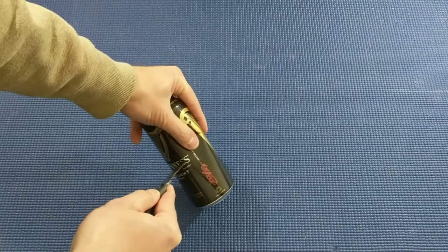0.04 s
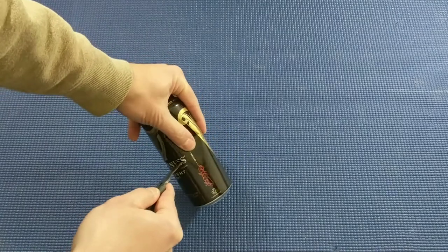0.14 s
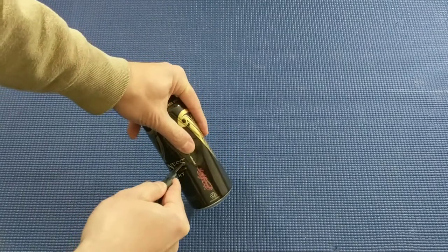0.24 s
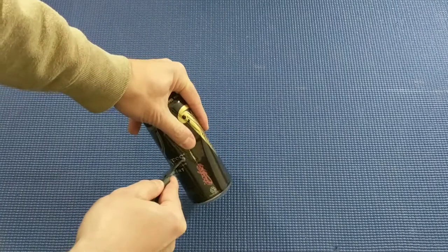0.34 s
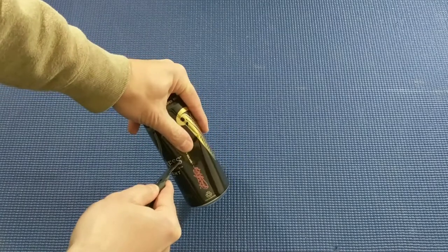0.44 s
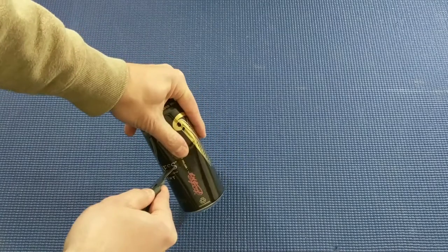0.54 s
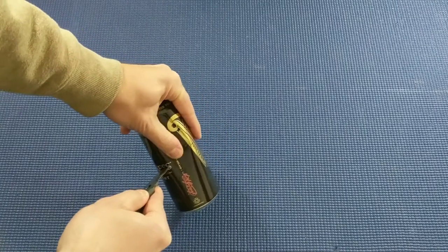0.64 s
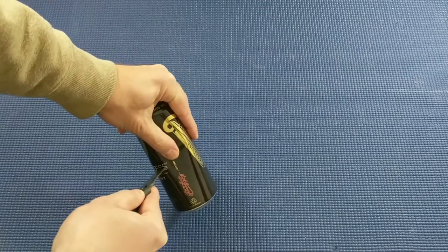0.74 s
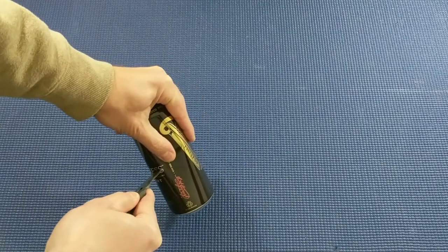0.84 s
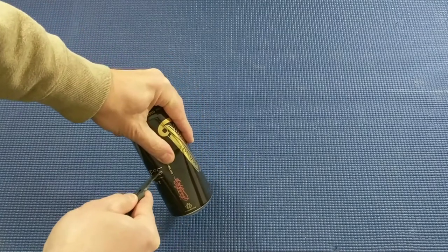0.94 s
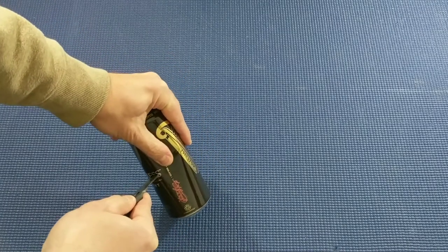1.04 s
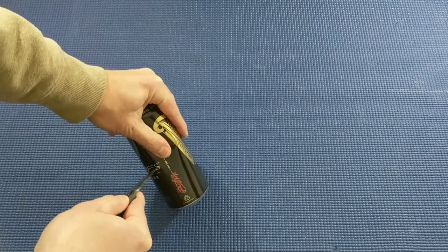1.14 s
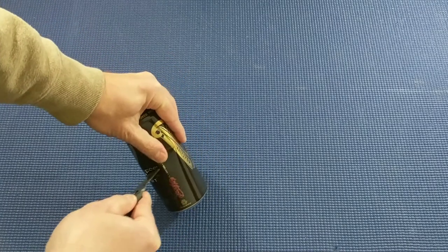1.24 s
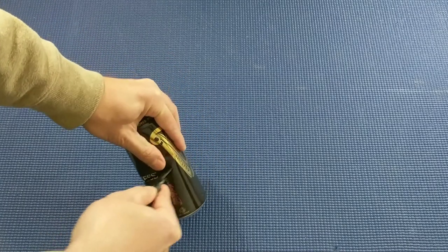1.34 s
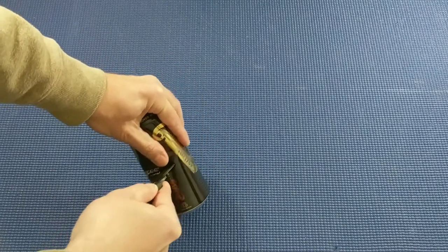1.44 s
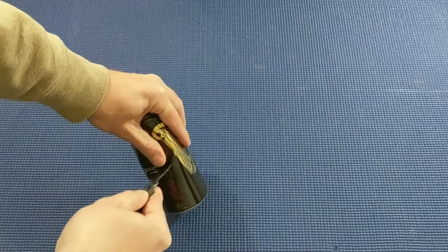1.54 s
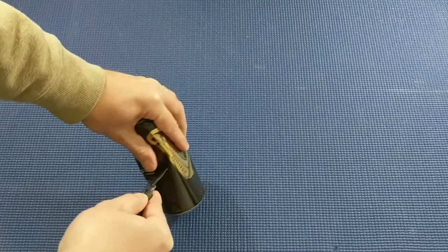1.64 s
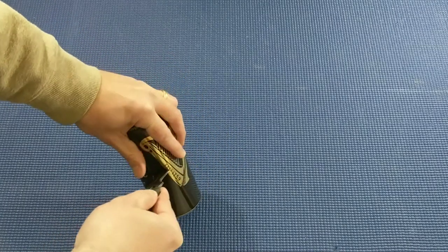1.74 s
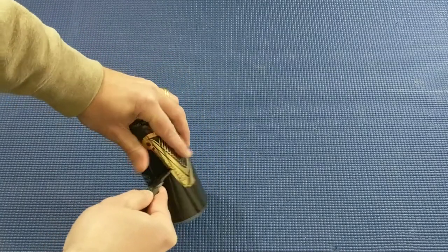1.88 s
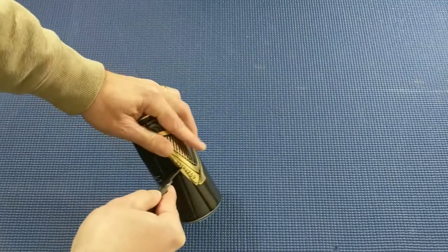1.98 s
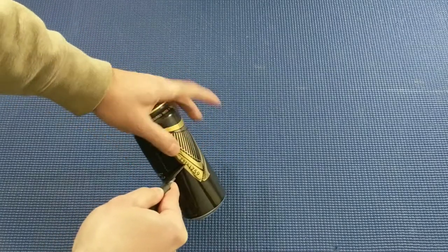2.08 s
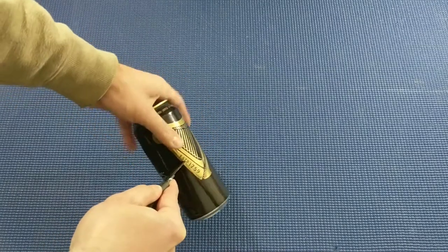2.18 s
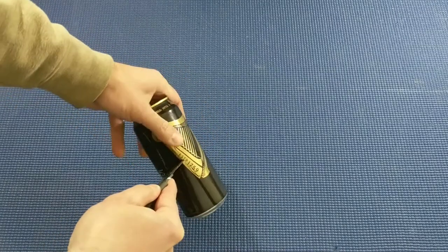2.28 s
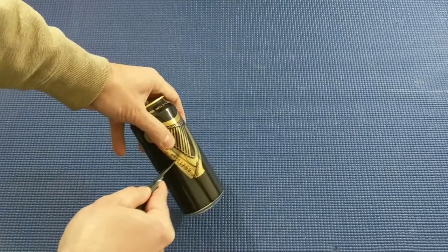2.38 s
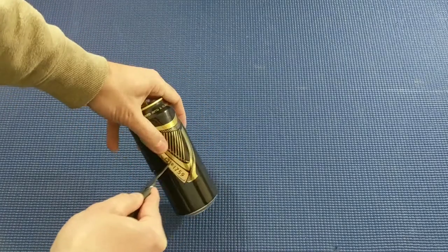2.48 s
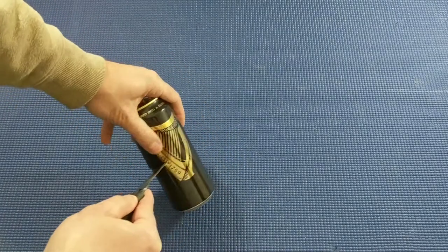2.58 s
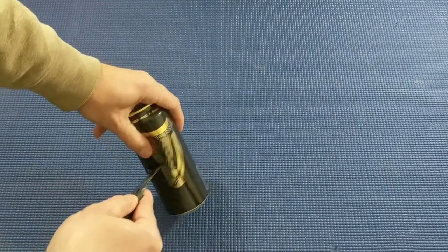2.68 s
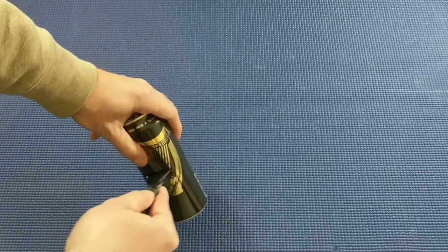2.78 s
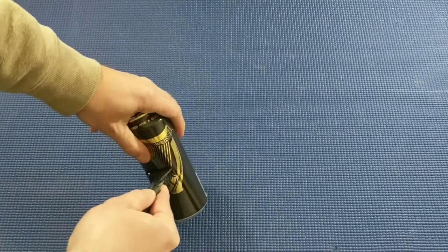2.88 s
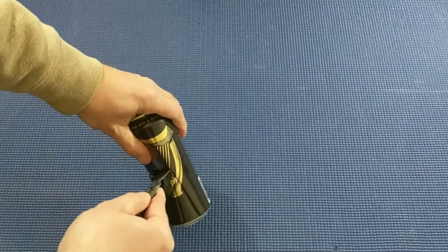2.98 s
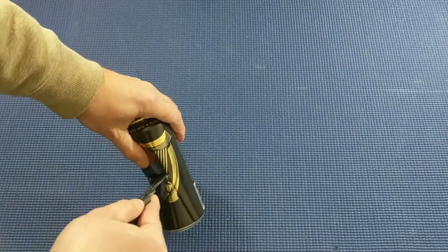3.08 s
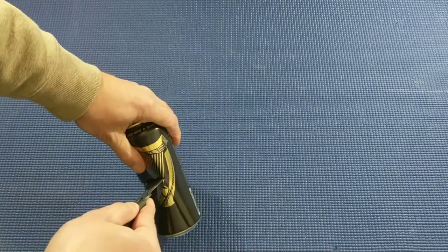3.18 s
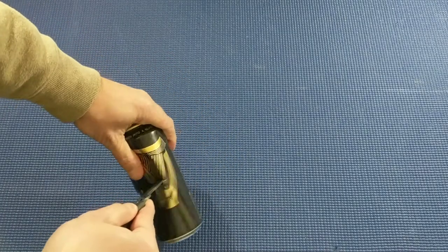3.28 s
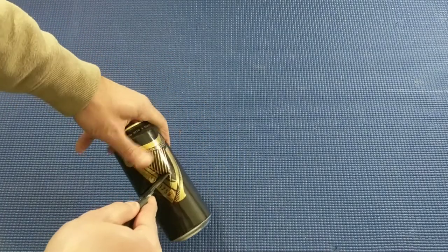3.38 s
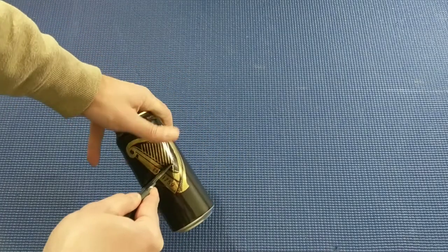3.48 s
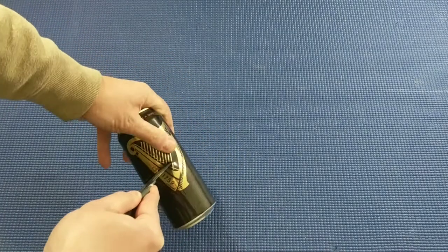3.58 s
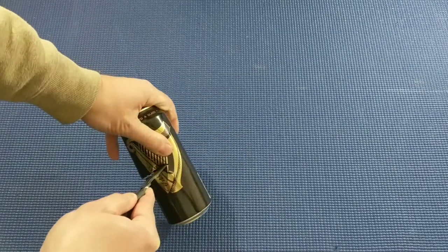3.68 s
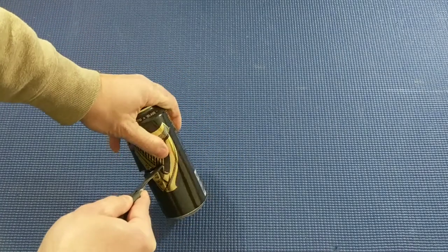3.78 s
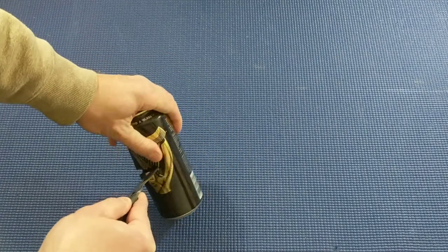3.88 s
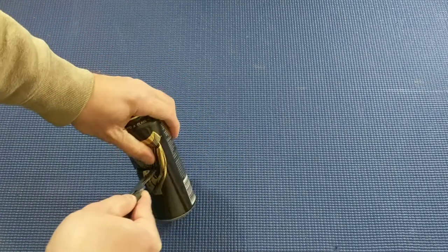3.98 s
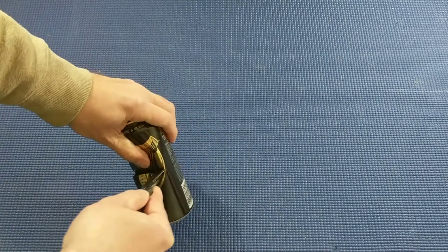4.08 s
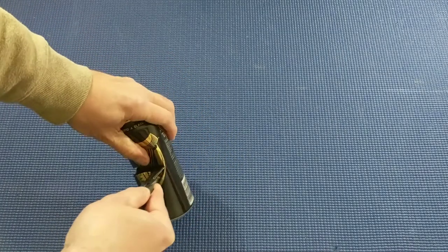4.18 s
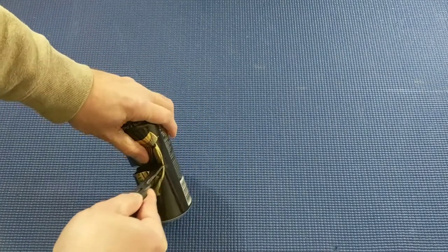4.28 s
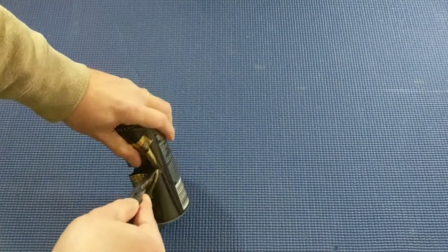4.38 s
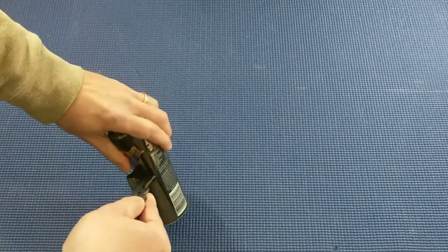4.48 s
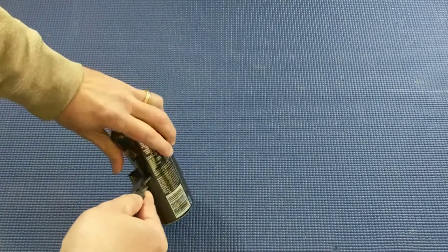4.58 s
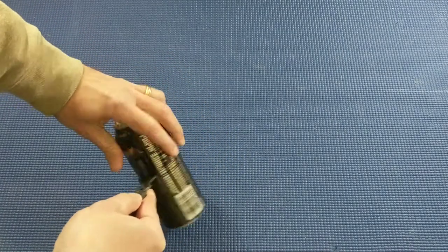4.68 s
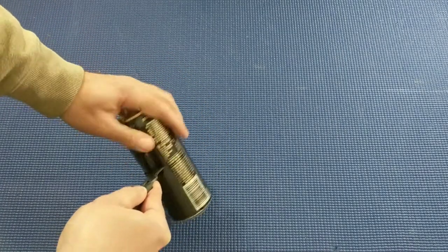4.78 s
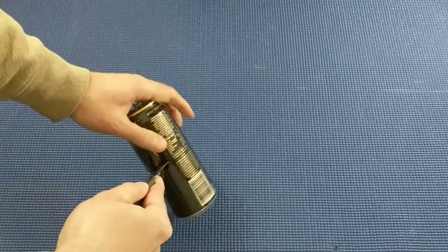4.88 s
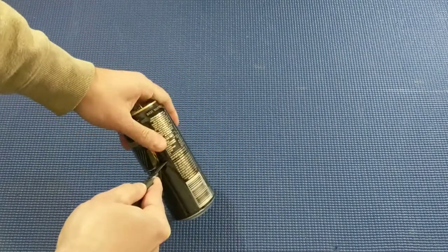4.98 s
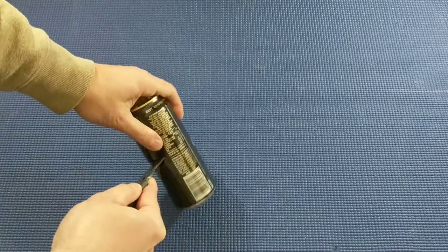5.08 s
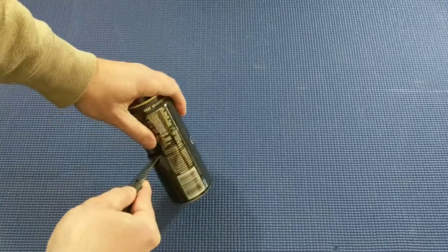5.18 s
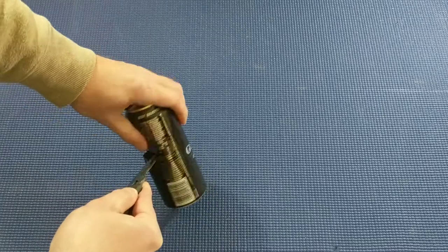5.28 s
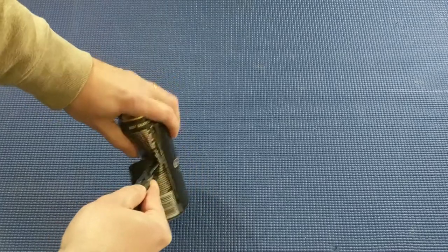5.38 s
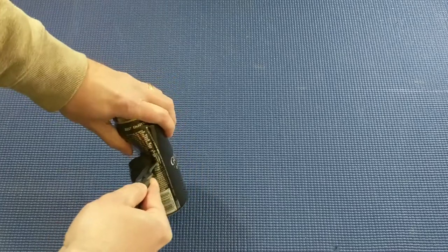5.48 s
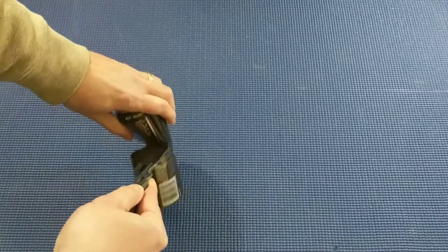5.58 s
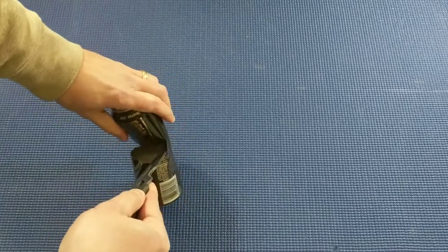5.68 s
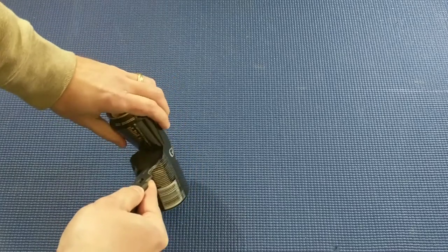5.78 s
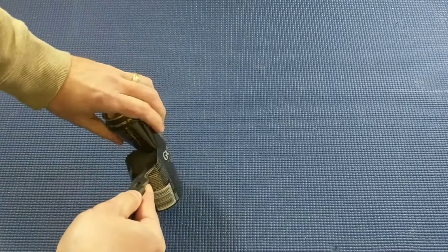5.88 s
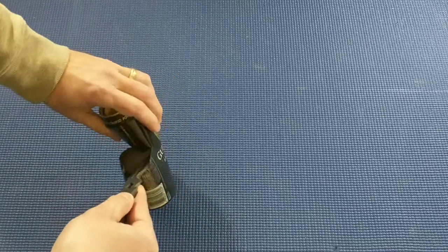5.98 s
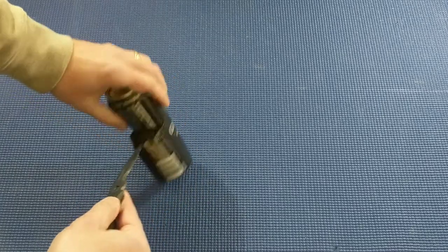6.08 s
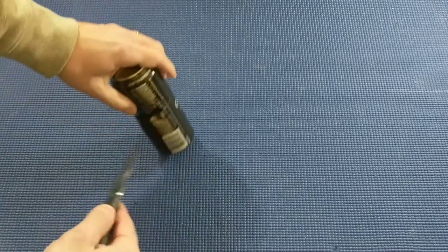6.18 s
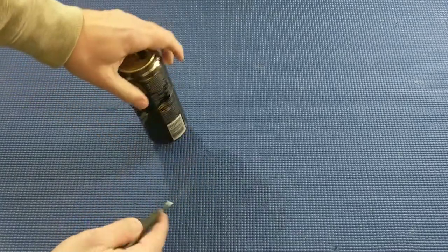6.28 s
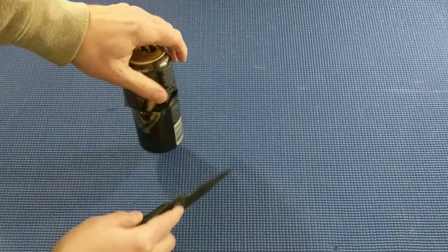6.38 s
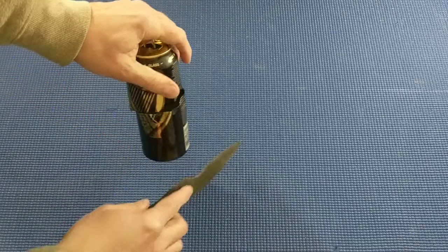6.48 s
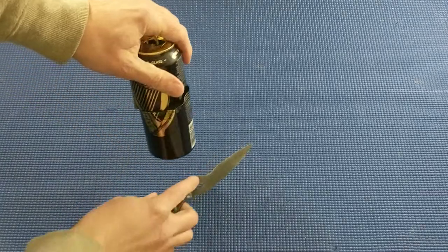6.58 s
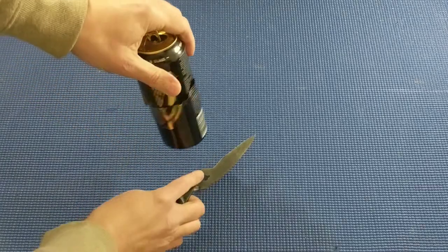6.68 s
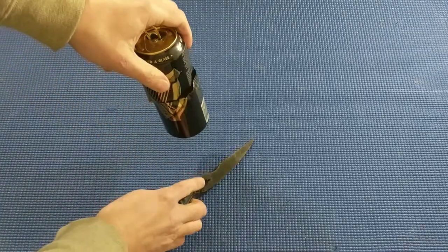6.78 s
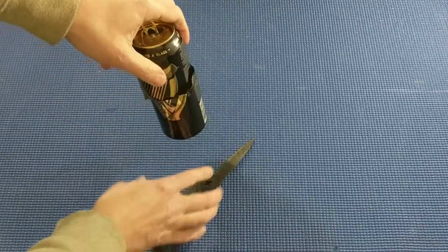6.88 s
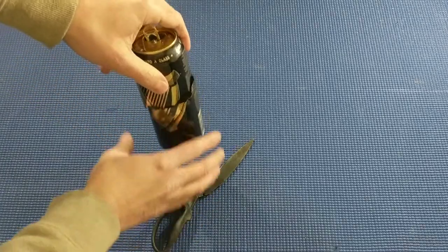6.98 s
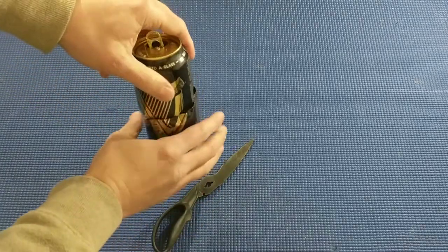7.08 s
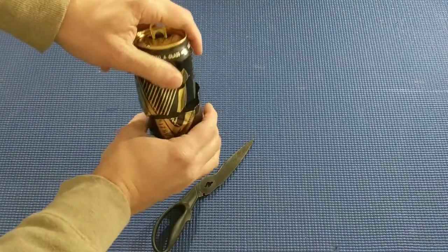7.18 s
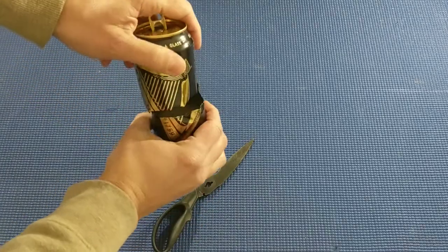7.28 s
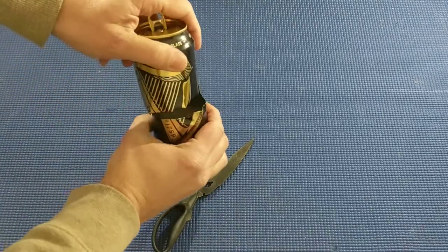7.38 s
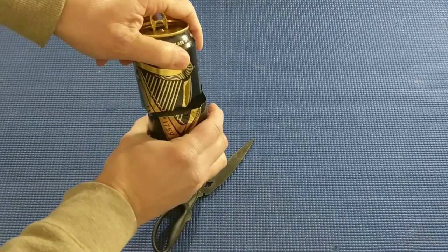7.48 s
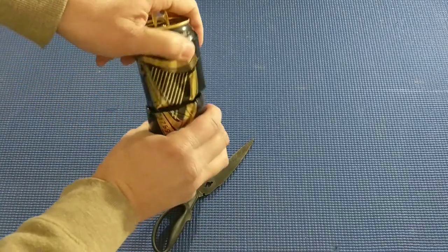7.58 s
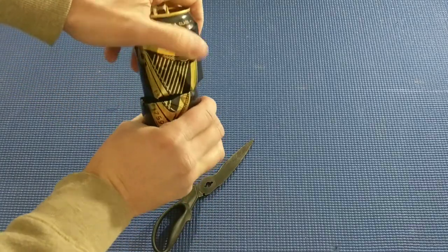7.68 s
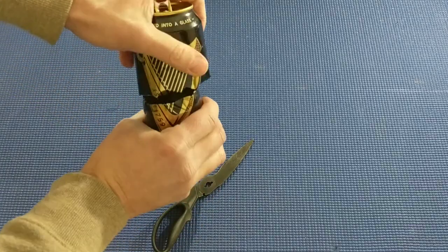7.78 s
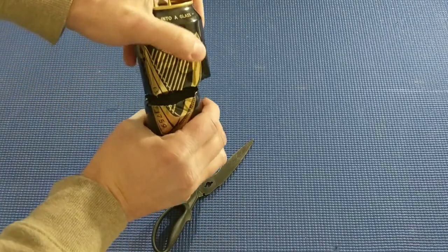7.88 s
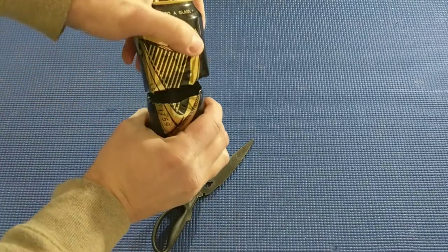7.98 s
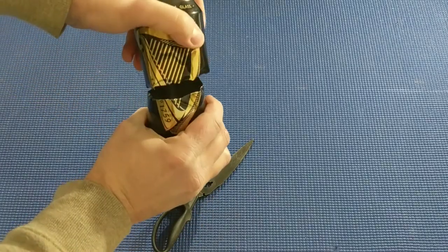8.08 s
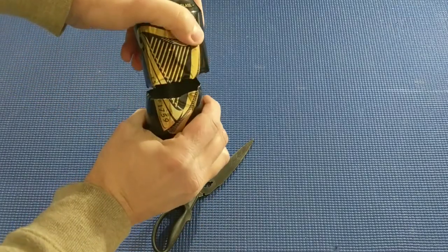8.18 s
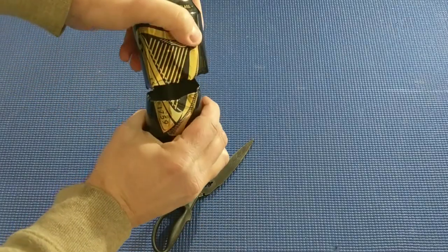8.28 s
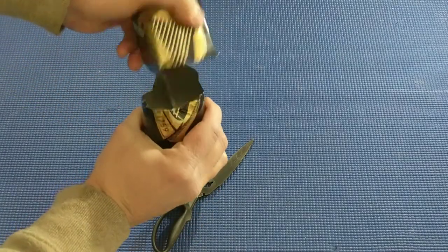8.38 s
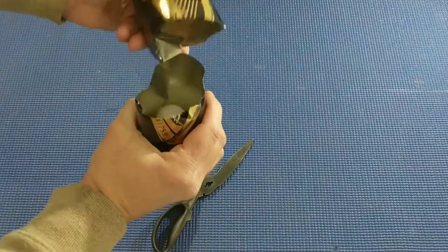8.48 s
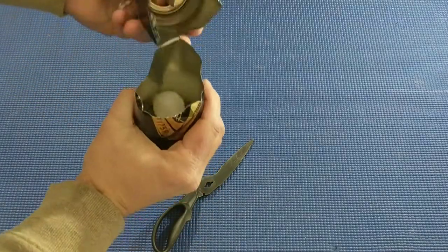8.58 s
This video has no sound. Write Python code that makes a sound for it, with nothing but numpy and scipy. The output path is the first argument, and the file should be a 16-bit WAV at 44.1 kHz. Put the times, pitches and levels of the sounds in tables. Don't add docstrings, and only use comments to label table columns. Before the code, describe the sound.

A quiet room with soft hiss, faint sleeve rustle and a barely audible electronic whine. A low bump on the mat opens, then at 0.2-0.5 s a scissor blade rasps into thin can metal with sharp snaps. After a lull, tearing resumes around 1.15-1.8 s, gritty and chattering. From 2.0 to 2.8 s loud tinny pops crack, the biggest near 2.4 s with a puff of air. Rips and dent pops cluster from 3.1 to 4.8 s, then a harsh bright rasp at 5.1 s and shorter tears until 6.2 s; the hollow hum inside the can climbs in pitch. Near quiet follows. At 6.9-7.0 s the scissors land on the mat with soft dull thuds and a small settling tick at 7.2 s. From 7.5 s the loosened halves click and pop sparsely, ending with two strong snaps and a brief tear at 8.4-8.55 s.

```python
import sys
import numpy as np
from scipy import signal
from scipy.fft import rfft, irfft
from scipy.io import wavfile
from scipy.ndimage import uniform_filter1d

SR = 44100
rng = np.random.default_rng(int(sys.argv[2]) if len(sys.argv) > 2 else 0)


def file_out(sig):
    cols = np.atleast_2d(sig).T
    lim = np.clip(cols, -1, 1)
    pcm = np.round(lim * 32767).astype(np.int16)
    wavfile.write(sys.argv[1], SR, pcm)


def to_linear_factor(level_db):
    exponent = np.asarray(level_db, float) / 20
    return 10 ** exponent


N = 381465
TIME_S = np.arange(N) / SR


def evened(x):
    return x / np.sqrt(np.mean(x ** 2) + 1e-20)


def read(points, hz):
    f, value = np.transpose(points)
    return np.interp(np.log(hz + 1), np.log(f + 1), value)


def add(mix, s, sound):
    part = mix[round(s * SR):][:len(sound)]
    part += sound[:len(part)]


def ring(x, hz, width_hz):
    turn = np.exp(2j * np.pi * np.cumsum(hz * np.ones(len(x))) / SR)
    envelope = signal.lfilter([1], [1, -np.exp(-np.pi * width_hz / SR)], x / turn)
    return (turn * envelope).real


def butter(x, order, hz, kind):
    return signal.sosfilt(signal.butter(order, hz, kind, fs=SR, output="sos"), x)


# frequency in Hz, density in dB per Hz.
ROOM_TONE = [(18, -35), (30, -11.5), (109, -9), (163, -6.5), (223, -7), (467, -20.5), (506, -18.5),
             (7670, -29.5), (9480, -30), (15600, -33), (16500, -49)]
# time in seconds, lift in dB.
RUSTLE_SWELL = [(0, 5.5), (1.004, 2), (2.997, 14), (6.3, 8.5), (6.6, 9.5), (6.85, 12.5), (7.3, -1.5),
                (8.65, 3)]


def hush():
    tone_db, whine_db = -72.5, -83
    whine_hz, whine_fall_hz, sweeps_per_s = 9450, 280, 21.5
    hz = np.fft.rfftfreq(N, 1 / SR)
    shaped = irfft(rfft(rng.standard_normal(N)) * to_linear_factor(read(ROOM_TONE, hz)), N)
    tone = to_linear_factor(tone_db) * evened(shaped)
    rustle_band = signal.butter(3, [250, 4800], "band", fs=SR, output="sos")
    rustle = signal.sosfiltfilt(rustle_band, tone)
    s, swell_db = np.transpose(RUSTLE_SWELL)
    swell = to_linear_factor(np.interp(TIME_S, s, swell_db)) - to_linear_factor(-2.0)
    sweep_hz = whine_hz - whine_fall_hz * (TIME_S * sweeps_per_s % 1)
    whine = to_linear_factor(whine_db) * np.sin(2 * np.pi * np.cumsum(sweep_hz) / SR)
    return to_linear_factor(3) * tone + rustle * swell + whine


# frequency in Hz, width in Hz, level in dB.
STAND = [(65, 57, 2), (120, 76, -4), (183, 18, -8)]
# time in seconds, level in dB, decay in seconds.
JOLTS = [(0, -48.5, 0.14), (.24, -64.5, 1), (1.16, -54.5, 0.58), (1.399, -53.5, 1), (2.41, -53, 0.13),
         (2.67, -50, 0.28), (3.181, -48, 0.057), (4.169, -53, 0.94), (4.55, -50.5, 0.2), (4.77, -43, 0.046),
         (5.66, -47, 0.13), (6.15, -59, 0.38), (6.93, -50.5, .4), (7.1, -59, 0.14), (8.531, -49.5, 0.08)]
# time in seconds, level in dB.
PUFFS = [(0.011, -64), (2.407, -31.5), (4.757, -26.5), (6.872, -42), (6.99, -49.5), (8.404, -45),
         (8.521, -37)]


def thumps():
    rise_db_per_s, fall_db, still_db = 303, 34.5, -70
    t = np.arange(0, N + 64, 64)[:, None] / SR
    s, db, decay_s = np.transpose(JOLTS)
    lost_db = np.maximum(rise_db_per_s * (s - t), fall_db * (t - s) / decay_s)
    level = np.sqrt(to_linear_factor(still_db) ** 2 + (to_linear_factor(db - lost_db) ** 2).sum(axis=1))
    shake = rng.standard_normal(N)
    low = np.zeros(N)
    for hz, width_hz, gain_db in STAND:
        twice_rung = ring(ring(shake, hz, width_hz), hz, width_hz)
        low += to_linear_factor(gain_db) * evened(twice_rung)
    out = evened(low) * np.interp(TIME_S, t[:, 0], level)
    u = np.arange(2500) / SR / .0022
    puff = u * (1 - u / 2) * np.exp(-u)
    for s, db in PUFFS:
        add(out, s, to_linear_factor(db + 15.5) * puff)
    return butter(out, 4, 40, "high")


# frequency in Hz, mode level in dB.
WALL = [(240, -14.5), (400, 0.5), (1000, -7), (2470, -7.5), (2760, -8.5), (4750, -9.5), (6590, -11),
        (15000, -22), (16500, -35)]
# frequency in Hz, t60 in seconds.
WALL_RING = [(800, .17), (2000, .13), (5000, .12), (14000, .11)]


def wall_rings(count, strong_hz, snap_db, lift_db, lift_width_hz):
    low_hz, treble_hz, scatter_db = 900, 4800, 2.0
    hz = np.linspace(350, 16500, 600)
    hz = hz + rng.uniform(-13, 13, len(hz))
    t = np.arange(4000)[:, None] / SR
    modes = np.cos(2 * np.pi * hz * t) * to_linear_factor(-60 * t / read(WALL_RING, hz))
    offset = (hz - np.reshape(strong_hz, (-1, 1))) / lift_width_hz
    lift = np.reshape(lift_db, (-1, 1)) * np.exp(-offset ** 2)
    chance = rng.standard_normal((count, 2, len(hz)))
    humps = evened(uniform_filter1d(chance[:, 0], size=15))
    size = to_linear_factor(read(WALL, hz) + lift + scatter_db * humps)
    snap = to_linear_factor(np.reshape(snap_db, (-1, 1))) * np.exp(-t.T / 0.00029)
    whole = (size * chance[:, 1]) @ modes.T + snap * (size @ modes.T)
    low = butter(whole, 3, low_hz, "low")
    body = butter(whole, 3, [low_hz, treble_hz], "band")
    treble = butter(whole, 3, treble_hz, "high")
    return [low, body, treble]


def slips(level_db, drift, sizes):
    spread_db = 3.3
    per_s = np.interp(level_db.max(), [-30, -19], [2600, 720])
    wobble = np.interp(level_db.max(), [-30, -19], [.9, .25])
    phase = np.cumsum(per_s * abs(1 + wobble * drift)) / SR
    at = np.diff(np.floor(phase), prepend=0)
    size_db = spread_db * np.minimum(sizes, 2 + per_s / 2000)
    return evened(at * to_linear_factor(size_db))


# start in dB re top, place of the top from 0 to 1, end in dB re top.
BITE = (-15.5, 0.24, -13.5)
CREEP = (-19, 0.75, -2.4)
SWELL = (-18, 0.69, -19.5)
HOLD = (-7, 0.057, -2.8)
# start in seconds, length in seconds, top in dB, air inside in dB re top, treble in dB re top.
BITES = [(0, 0.043, -44, 5.5, -8), (1.425, 0.031, -38, 1.5, -11), (.266, .082, -24.5, -13, -12),
         (1.753, 0.092, -28.5, 7.5, -12), (3.125, 0.044, -26, 1, -17.5), (4.015, 0.063, -38, -4.5, -10),
         (4.135, 0.072, -30, -6, -11.5), (4.88, 0.038, -28.5, -11, -4.5),
         (5.805, 0.098, -25.5, -3.5, -13.5), (8.445, 0.043, -24, -6, -8), (8.49, 0.027, -28.5, -3.5, -6),
         (4.98, 0.065, -55.5, 2, -13), (7.836, 0.02, -32.5, 19, -14.5)]
CREEPS = [(.2, 0.054, -43, 4.5, -19), (.41, 0.034, -27.5, -7.5, -13.5), (1.29, 0.065, -34, 3.5, -9.5),
          (1.355, 0.043, -28, -1.5, -10), (1.94, 0.028, -45, 12.5, -6), (2.735, 0.032, -51.5, 13, -36),
          (3.26, 0.22, -51, 11.5, -35.5), (4.455, 0.02, -45, 0, -8), (5.055, 0.011, -38, -8.5, -17.5),
          (5.32, 0.065, -38.5, 0, -10.5), (7.69, 0.16, -53.5, 9, -9)]
SWELLS = [(.61, 0.046, -49.5, -3.5, -16), (.685, 0.041, -42, 0, -15), (2.54, 0.12, -27.5, -3, -13),
          (1.526, 0.09, -20.5, 2.5, -15.5), (6.08, 0.071, -25.5, -4, -4.5), (6.145, 0.055, -23.5, -6, -8.5)]
HOLDS = [(1.15, 0.053, -26, 0.5, -14), (2.24, 0.05, -52, -6.5, -22), (2.775, 0.073, -28, 2.5, -12.5),
         (2.96, 0.079, -48, 4.5, -21), (3.705, 0.087, -38.5, -2.5, -19), (3.803, 0.067, -29.5, -7.5, -20),
         (4.085, 0.069, -40, 5, -11), (4.28, 0.019, -50, 16, -21), (4.33, 0.074, -28, -6, -16),
         (4.5, 0.13, -32, -7.5, -10.5), (5.135, 0.085, -16.5, -24, -9), (5.42, 0.066, -30.5, -8, -9.5),
         (5.505, 0.023, -40, 3.5, -14), (5.55, 0.049, -46.5, -3, -17), (5.606, 0.052, -28, -0.5, -4.5),
         (5.665, 0.052, -36, -2.5, -9.5), (5.735, 0.18, -41, 1, -8.5), (5.98, 0.048, -43.5, 1, -10.5),
         (6.92, 0.019, -55.5, -18, -7.5), (7.168, 0.03, -50.5, 0, -11.5)]


def tearing():
    let_go_s, let_go_db = 0.02, -23.5
    lump_db, air_lag_share = 1.0, 0.046
    sheet_db, sheet_t60_s, grip_t60_s = -6, .2, 0.021
    wall, air, step = np.zeros(N), np.zeros(N), 330
    rings = wall_rings(count=80, strong_hz=4000, snap_db=np.repeat([-16, -8], 40),
                       lift_db=np.repeat([0, 17], 40), lift_width_hz=1500)
    grip = to_linear_factor(-60 * np.arange(step * 3) / SR / grip_t60_s)
    gripped = [r[:, :step * 3] * grip for r in rings]
    spots = [g / np.linalg.norm(g, axis=1, keepdims=True) for g in gripped]
    drift = evened(uniform_filter1d(rng.standard_normal(N), size=30))
    sizes = rng.exponential(1, N)
    lumps = evened(uniform_filter1d(rng.standard_normal(N), size=350))
    places = np.repeat(rng.integers(0, 40, N // step + 1), step)
    for strokes, (start_db, top, end_db) in ((CREEPS, CREEP), (HOLDS, HOLD), (BITES, BITE), (SWELLS, SWELL)):
        for s, length, top_db, air_db, treble_db in strokes:
            end = s + length
            span = slice(round(s * SR), round((end + let_go_s) * SR))
            t = TIME_S[span]
            ease_db = np.interp(t, [s, s + top * length, end, end + let_go_s],
                                [start_db, 0, end_db, end_db + let_go_db])
            level_db = top_db + ease_db
            uneven_db = lump_db * (top_db < -20) * lumps[span]
            push = slips(level_db, drift[span], sizes[span]) * to_linear_factor(level_db + uneven_db)
            low_db = air_db - air_lag_share * ease_db
            spot = places[span] + 40 * (air_db < -11)
            add(air, t[0], to_linear_factor(-16) * to_linear_factor(low_db) * push)
            for shapes, db in zip(spots, (low_db - 6.5, 0, treble_db)):
                force = push * to_linear_factor(db)
                for k in range(0, len(t), step):
                    add(wall, t[k], signal.fftconvolve(force[k:k + step], shapes[spot[k]]))
    sheet = rings[1][0] + rings[2][0]
    sheet = sheet * to_linear_factor(-60 * np.arange(len(sheet)) / SR / sheet_t60_s)
    modes = rfft(sheet)
    sheet = irfft(modes / np.sqrt(uniform_filter1d(abs(modes) ** 2, size=30) + 1))
    leak = signal.oaconvolve(wall, sheet / np.linalg.norm(sheet))[:N]
    return wall + to_linear_factor(sheet_db) * leak, air


# time in seconds, ring in Hz, level in dB re the tear.
STRIP = [(.3, 3025, 4), (1.18, 2820, -15.5), (1.6, 2630, -21.5), (2.6, 2230, -16), (3.14, 1690, 1.5),
         (3.329, 1800, 7.5), (3.75, 1730, 1.5), (3.811, 2900, 4.5), (3.88, 3280, 0), (4.15, 1460, 8),
         (4.37, 3470, -4), (4.549, 1940, -7.5), (5.18, 3260, -4), (5.64, 1490, -13), (5.85, 1390, -18.5),
         (6.12, 2700, -27), (6.19, 1865, -24), (8.47, 2620, -0.5)]


def strip(torn):
    width_hz = 420
    s, hz, db = np.transpose(STRIP)
    unit = 2 * (1 - np.exp(-np.pi * width_hz / SR))
    rung = ring(torn, np.interp(TIME_S, s, hz), width_hz)
    return to_linear_factor(np.interp(TIME_S, s, db)) * unit * rung


# time in seconds, slit resonance in Hz, pipe resonance in Hz, pipe in dB re the slit.
AIR = [(0, 324, 1247, -13.5), (1.202, 343, 1276, -13), (1.8, 445, 1370, -16.5), (2.804, 460, 1238, -15),
       (3.8, 492, 1270, -8.5), (4.5, 620, 1308, -6.5), (5.449, 573, 1216, -1.5), (5.66, 820, 1075, -8),
       (5.79, 690, 1114, 0), (5.9, 810, 1127, -1.5), (6.15, 804, 1160, -11), (6.299, 646, 1236, -27),
       (7.501, 660, 1275, -13), (7.899, 717, 1290, -24), (8.279, 826, 1255, -21), (8.42, 810, 1264, 1.5),
       (8.54, 900, 1050, 2), (8.65, 815, 1200, 16)]
# frequency in Hz, width in Hz, level in dB.
SHELL = [(338, 36, 1), (388.3, 46, 0.5), (493.2, 29, -1.5), (620, 40, 0.5), (665, 31, -1), (755, 73, -0.5),
         (810, 71, 0.5), (865.4, 31, -0.5), (933, 17, -3)]


def can_air(kicks):
    stir_db, wake_octaves, asleep_db, pipe_width_hz = -93.5, 0.24, -17.5, 36
    s, *columns = np.transpose(AIR)
    slit_hz, pipe_hz, pipe_db = (np.interp(TIME_S, s, c) for c in columns)
    drive = kicks + to_linear_factor(stir_db) * rng.standard_normal(N)
    shell = np.zeros(N)
    for k, (hz, width_hz, db) in enumerate(SHELL):
        octaves_off = np.log2(hz / slit_hz)
        awake = to_linear_factor(asleep_db) + np.exp(-(octaves_off / wake_octaves) ** 2)
        shell += (-1) ** k * to_linear_factor(db - 1.5) * ring(drive * awake, hz, width_hz)
    return shell - ring(drive * to_linear_factor(pipe_db), pipe_hz, pipe_width_hz)


# time in seconds, peak in dB, air inside in dB re peak, treble in dB re peak, strongest ring in Hz.
CUTTING_POPS = [(.2788, -15, -17, -24, 2940), (.4309, -5.5, -39.5, -1.5, 3100), (1.1503, -21.5, 0, -5, 2050),
                (1.4112, -7, -15.5, -6.5, 1970), (1.9854, -7, -9, 2, 4400), (2.0193, -12, -26, -10, 2800),
                (2.1061, -14, -14, -43, 3150), (2.1236, -5.5, -13.5, 0.5, 1450),
                (2.3067, -6, -20.5, -8, 1320), (2.4079, -0.5, -12.5, -1.5, 2780),
                (2.7686, -7.5, -8.5, -10, 1620), (2.804, -12, 2, -0.5, 5170), (2.9537, -20.5, -9, -16, 1450),
                (3.0056, -15, -3, -15, 2885), (3.3787, -11.5, -9, -17, 1830), (3.4351, -5, -18, -3.5, 1670),
                (3.4531, -3, -18.5, -5.5, 3070), (3.5843, -5, -14.5, 7.5, 3570),
                (3.929, -18, -6, -6, 2110), (4.0129, -8, -17.5, 4, 3750), (4.0769, -6.5, -10.5, -7, 1570),
             (4.114, -20, -7, 5, 4500), (4.1929, -19, -10.5, -8, 2170), (4.3204, -8.5, -13.5, -12, 3280),
             (4.4905, -16.5, 3, -16, 2215), (4.655, -14, -1.5, -21, 1010), (4.6967, -11, -14.5, -14, 2550),
             (4.7612, -4.5, -16, 6.5, 4600), (5.0789, -13.5, -38, -20, 1730), (5.0835, -8, -25, -2, 1730),
             (5.1153, -7, -36, -4.5, 2650), (5.3172, -28.5, -8.5, 10, 1400), (5.3961, -15, -10.5, -4, 1380),
             (5.6134, -19, -12, -14, 1530), (5.94, -20, -10, -5.5, 1081), (6.1656, -16.5, -11, 4.5, 4900),
             (6.8732, -33, 8, -33, 1340)]
PARTING_POPS = [(7.5558, -13.5, -4, -12.5, 2330), (7.8322, -20.5, 3.5, 7.5, 4750),
                (7.833, -34, -20, 8, 13500), (7.8509, -13, -10, -6.5, 1890), (7.957, -9, -9.5, -18, 1970),
                (8.1965, -9.5, -31, 1, 1350), (8.4061, -3.5, -19, -4.5, 1390), (8.526, -5, -10.5, -1, 1050)]
# time in seconds, peak in dB,
# air inside in dB re peak, strongest ring in Hz.
TICKS = [(0.0115, -27.5, -5.5, 2340), (0.6869, -33, -9, 1697), (1.256, -52.5, 17, 1170),
         (1.7564, -18.5, 3, 1800), (2.2902, -30, -3, 1730), (2.3842, -27.5, -3.5, 1260),
         (2.7337, -31.5, -14, 1280), (2.9146, -37, -8, 3000), (3.08, -45, 8.5, 3240),
         (3.6378, -32, 2, 4030), (3.675, -30.5, -10, 3400), (3.7027, -28.5, -14, 1710),
         (4.2353, -24, -6, 1710), (4.9122, -25.5, -11, 3900), (6.0036, -25, -11, 1160),
         (6.2738, -28.5, 0.5, 1490), (6.291, -41.5, 5.5, 1300), (6.363, -53, -21, 8000),
         (7.386, -57.5, -16, 2930), (6.9918, -49, -17.5, 2180), (7.0796, -48, -9.5, 1310),
         (7.209, -25, -36, 3070), (7.644, -42.5, 0.5, 1440), (7.6939, -53.5, 24.5, 1240),
         (7.7123, -39.5, -11, 1260), (7.7508, -31, 6.5, 1280), (7.7943, -37, 6, 1300),
         (8.066, -43.5, -27.5, 1260), (8.106, -48, -3, 1236),
         (1.3567, -25, -16, 3570), (1.3922, -24, -19, 3520), (1.5573, -14.5, -4, 2220),
         (3.992, -38, -3, 3000), (2.6209, -27, -19, 2370), (3.1352, -59, -1.5, 1760),
         (3.8057, -40, -8, 2980), (4.036, -32.5, -3, 2000), (4.1519, -22, -10, 1360),
         (4.531, -22.5, -9, 2055), (4.8877, -27.5, -24, 5900), (5.1367, -14, -15, 3290),
         (5.3671, -18, -11, 1220), (5.4315, -24, -2.5, 2830), (5.507, -24, -11, 2500),
         (5.635, -19.5, -10.5, 3530), (5.8331, -49, -8, 1460), (6.1154, -21, -20, 2700),
         (1.9826, -11.5, -9, 4200)]


def pops():
    tick_treble_db = -9
    wall, air = np.zeros(N), np.zeros(N)
    rows = CUTTING_POPS + PARTING_POPS
    rows = rows + [(s, db, air_db, tick_treble_db, hz) for s, db, air_db, hz in TICKS]
    rings = wall_rings(count=len(rows), strong_hz=[p[4] for p in rows], snap_db=-14, lift_db=7, lift_width_hz=320)
    t = np.arange(rings[0].shape[1]) / SR
    damped = to_linear_factor(-60 * t / 0.19) + to_linear_factor(-23 - 60 * t / 0.12)
    cracks = rng.standard_normal((len(rows), 130)) ** 3 * np.exp(-t[:130] / .001)
    for (s, db, air_db, treble_db, _), low, body, treble, crack in zip(rows, *rings, cracks):
        crack = crack / np.linalg.norm(crack)
        for shape, rel_db, flip_db in ((low, air_db - 2.0, 6), (body, 0, 9), (treble, treble_db, 4)):
            flip = np.convolve((shape * np.exp(-t / .0006))[:300], crack)
            sound = shape * damped
            add(sound, 0, to_linear_factor(flip_db) * flip)
            add(wall, s - .0003, to_linear_factor(db + rel_db + 0.5) * sound / abs(sound).max())
        add(air, s, to_linear_factor(db + air_db - 3.5) * np.ones(1))
    return wall, air


# frequency in Hz, t60 in seconds.
ROOM = [(200, .3), (1000, .24), (5000, .17), (14000, .12)]


def room(x):
    taps = np.zeros(SR // 2)
    at = np.arange(200, len(taps) - 20, 20)
    taps[at + rng.integers(0, 20, len(at))] = rng.choice([-1., 1.], len(at))
    hz, t, z = signal.stft(taps, SR, nperseg=256)
    decay = to_linear_factor(-60 * t / read(ROOM, hz)[:, None])
    tail = signal.istft(z * decay, SR, nperseg=256)[1]
    return signal.fftconvolve(x, tail / np.linalg.norm(tail))[:N]


# time in seconds, level in dB, ring in Hz, t60 in seconds.
LAID = [
    (6.872, -43, 347, 0.16),
    (6.875, -47, 540, .07),
    (6.88, -44, 61.7, 0.56),
    (6.99, -47.5, 197, 0.21),
    (7.0, -39, 119.5, 0.24),
    (7.009, -42.5, 58, 0.6),
    (7.195, -51, 356, 0.12),
]
FREED = [(6.62, -55, 1050, .12), (7.525, -59, 400, .08), (7.695, -50, 680, .2), (8.105, -57, 385, .3),
         (8.105, -58, 1235, .15), (8.2, -40, 1235, .17), (8.265, -63, 818, .9), (8.58, -57, 1180, .6)]


def soft_rings():
    rise_s = 0.0033
    out, t = np.zeros(N), np.arange(SR // 2) / SR
    fade = (1 - np.exp(-t / rise_s)) * np.minimum(1, (t[-1] - t) * 10)
    for s, db, hz, t60_s in LAID + FREED:
        add(out, s, fade * to_linear_factor(db - 60 * t / t60_s) * np.sin(2 * np.pi * hz * t))
    return out


def scene():
    torn, shaken = tearing()
    popped, kicked = pops()
    can = torn + strip(torn) + popped + can_air(shaken + kicked)
    can = butter(can, 6, 280, "high")
    thin = butter(can, 4, 560, "high")
    gaping = np.interp(TIME_S, [6.2, 7.4], [0, .68])
    can += gaping * (thin - can)
    mix = can + to_linear_factor(-21.0) * room(can) + thumps() + soft_rings() + hush()
    return mix[None]


def roll_off(x):
    return signal.sosfilt(signal.butter(12, 17000, fs=SR, output="sos"), x)


def record(dry):
    ceiling, edge_hz = .93, 16300
    edge = signal.firwin(255, edge_hz, window=("kaiser", 7), fs=SR)
    mix = signal.oaconvolve(np.clip(dry, -ceiling, ceiling), edge[None], "same")
    return roll_off(mix)


dry = scene()
out = record(dry)
file_out(out)
```